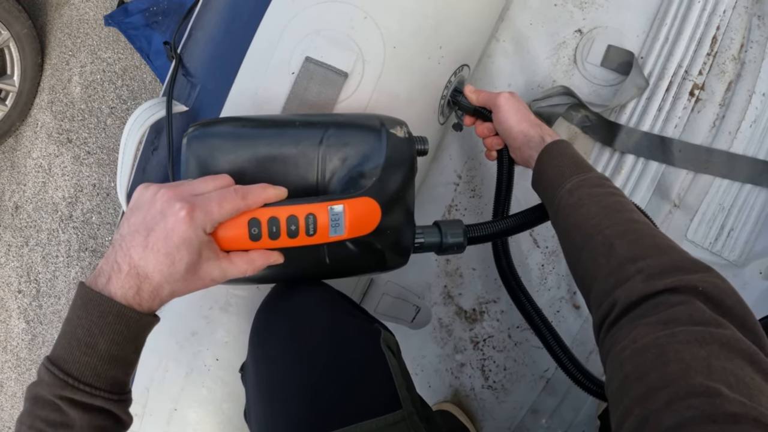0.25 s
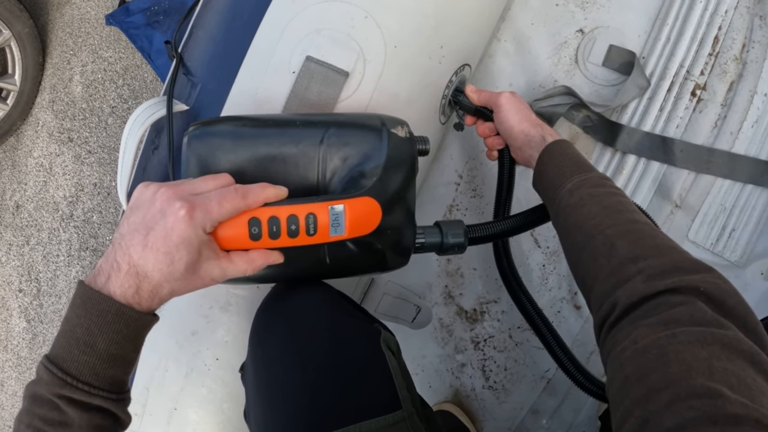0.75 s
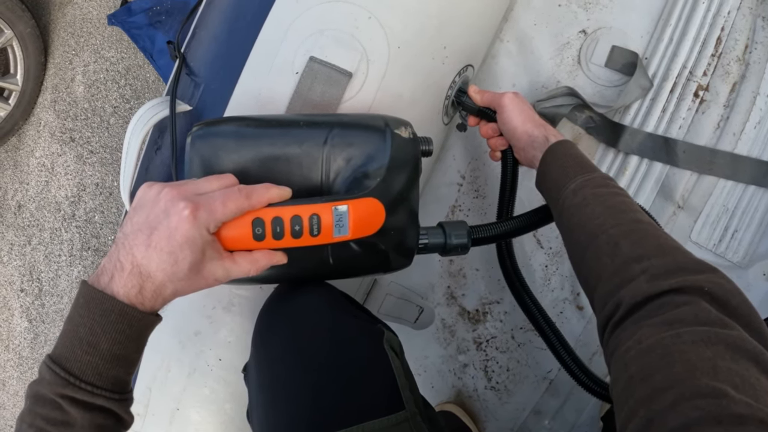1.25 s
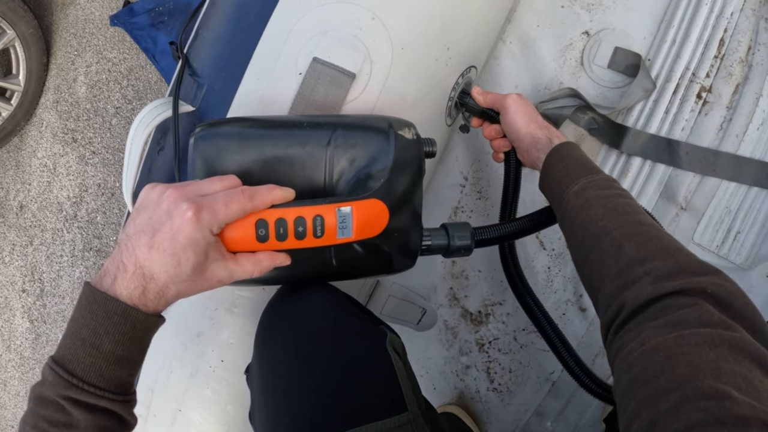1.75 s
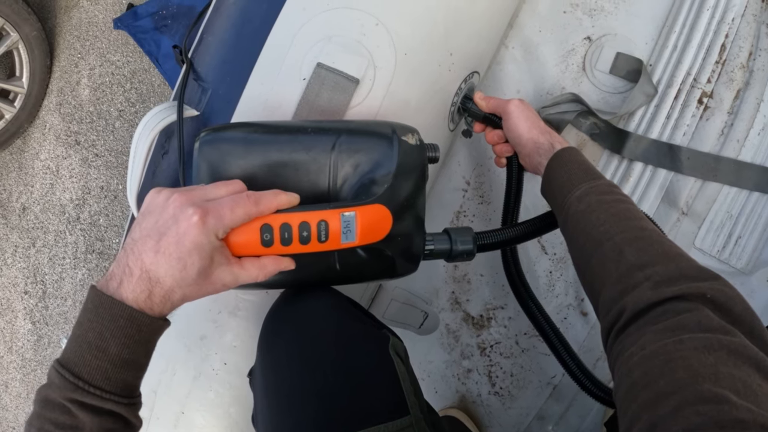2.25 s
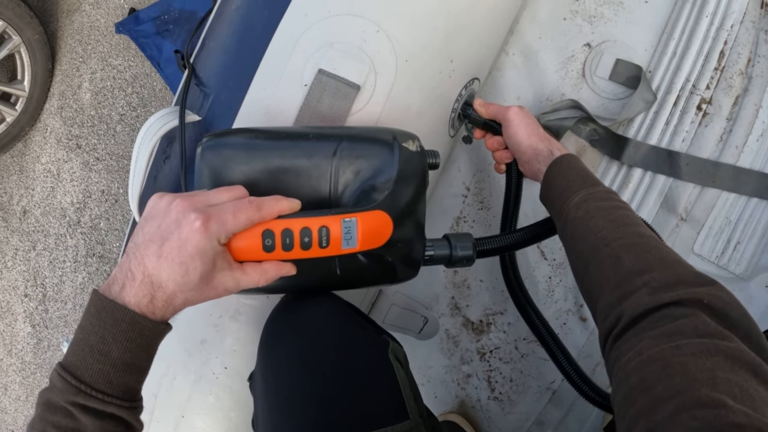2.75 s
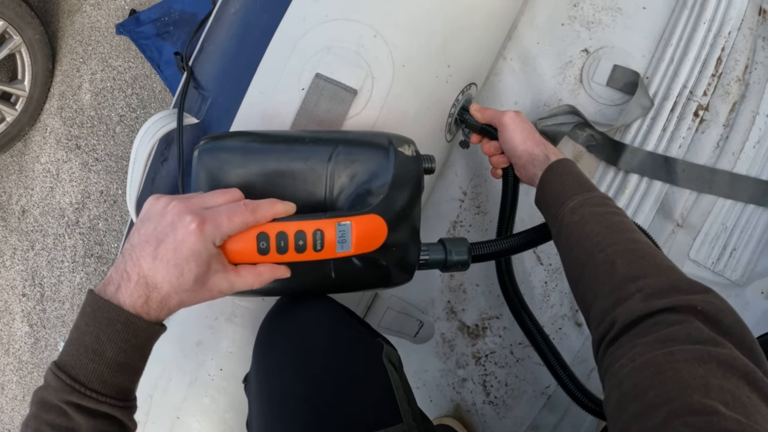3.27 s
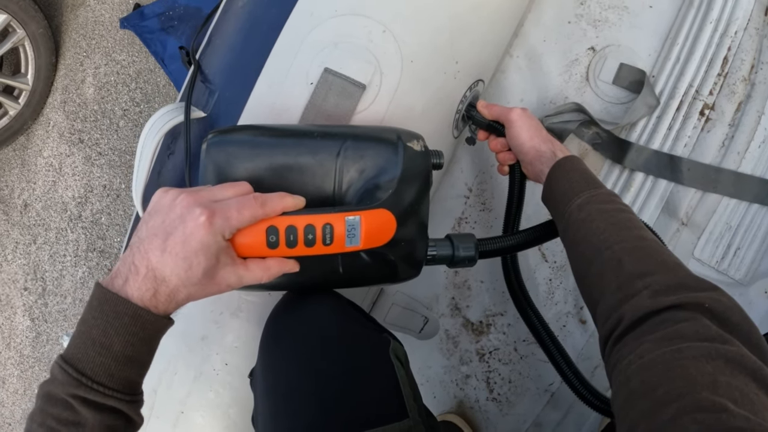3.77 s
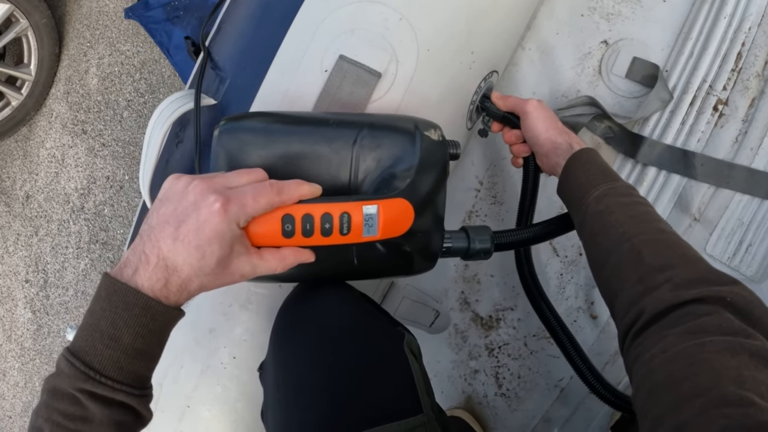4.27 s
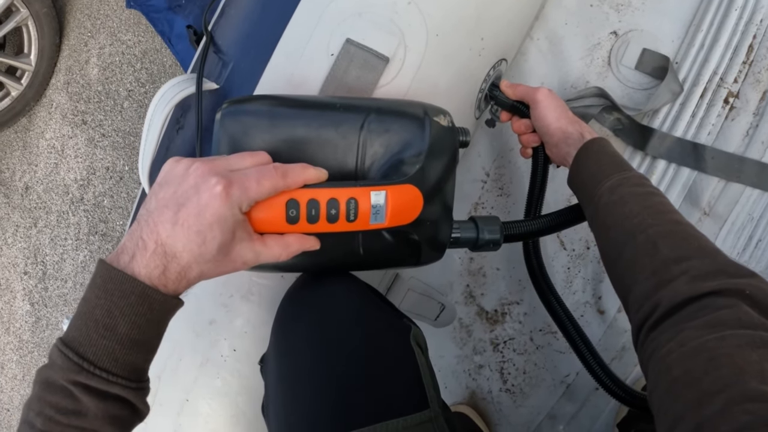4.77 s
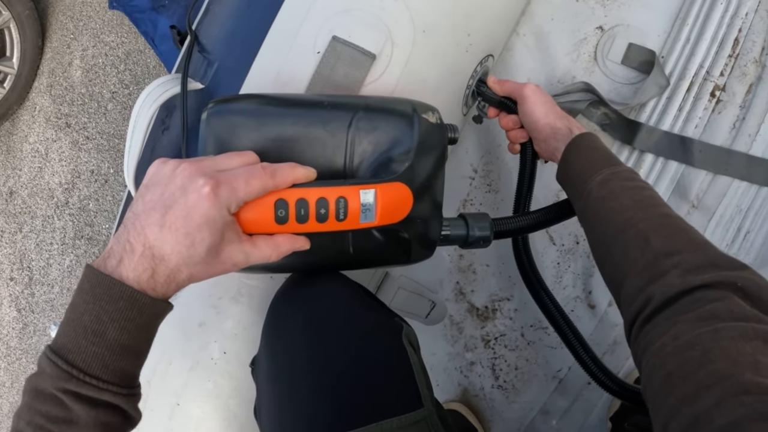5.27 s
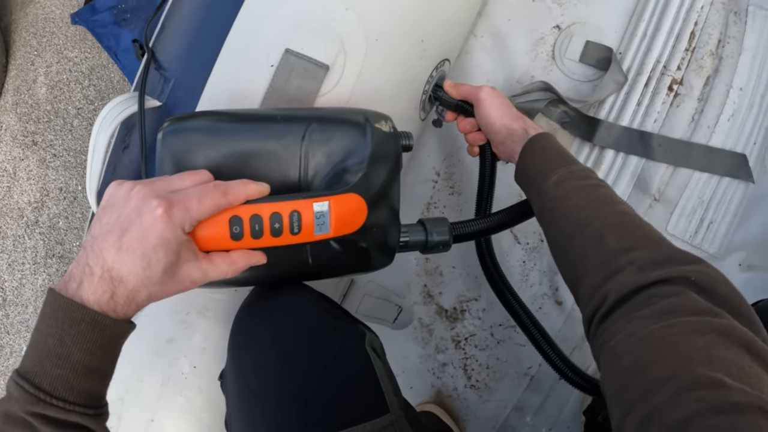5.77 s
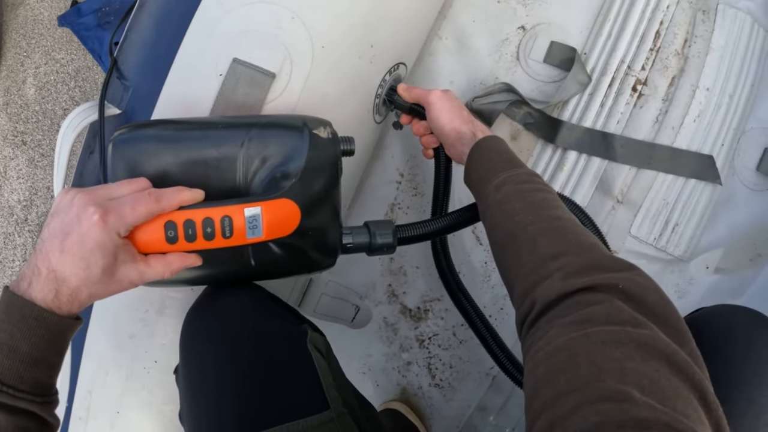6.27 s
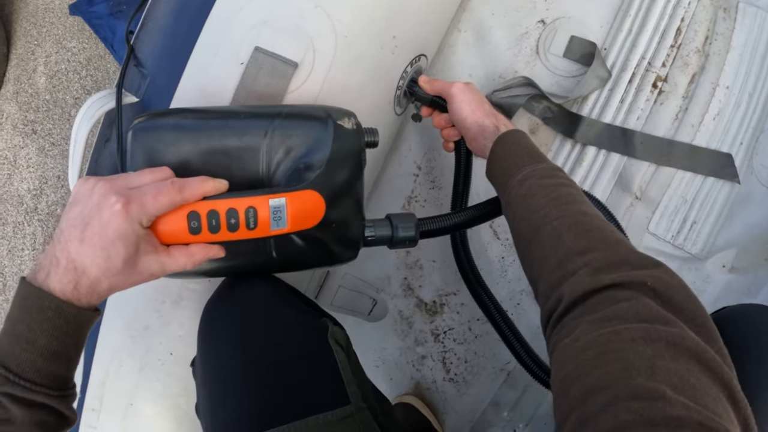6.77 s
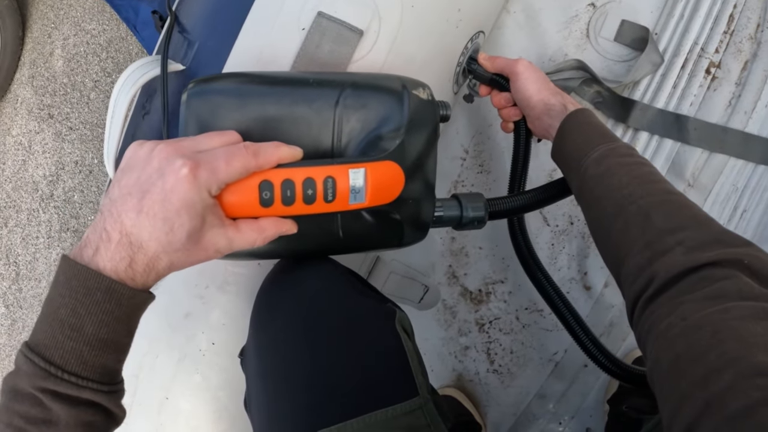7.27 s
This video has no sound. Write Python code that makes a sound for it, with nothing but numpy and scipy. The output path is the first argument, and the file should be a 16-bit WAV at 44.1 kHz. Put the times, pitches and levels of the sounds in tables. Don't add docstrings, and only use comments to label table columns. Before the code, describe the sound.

Loud, steady mechanical drone from a small piston pump inflating a rubber boat, already running at the start and still running at the end. Rapid valve snaps fuse into a coarse buzz with fluttering gear rattle and whine. Breathy hose air sits beneath. Thin, high leak hisses come and go at the nozzle, clearest in the second half, while soft wind rumble grows. Dry, open-air, close stereo pickup, with the pump mostly central.

```python
import sys
import numpy as np
from scipy import signal
from scipy.fft import rfft, irfft
from scipy.io import wavfile

SR = 44100
rng = np.random.default_rng(int(sys.argv[2]) if len(sys.argv) > 2 else 0)


def gain_from_decibels(decibels):
    exponent = np.asarray(decibels, float) / 20
    return 10 ** exponent


def to_wav(sig):
    pcm = np.clip(np.atleast_2d(sig), -1, 1) * 32767
    pcm = np.round(pcm).astype(np.int16)
    wavfile.write(sys.argv[1], SR, pcm.T)


N = 332073
HZ = np.fft.rfftfreq(N, 1 / SR) + 1
PINION, WHEEL = 11, 64


def rms_one(x):
    return x / np.sqrt(np.mean(x ** 2) + 1e-20)


def in_time(rows):
    s, *columns = np.transpose(rows)
    return [np.interp(np.arange(N) / SR, s, c) for c in columns]


def colour(x, points, turn=1):
    hz, db = np.transpose(points)
    gain = gain_from_decibels(np.interp(np.log(HZ), np.log(hz), db))
    return irfft(rfft(x) * turn * gain, N)


def drift(rate_hz):
    r = np.exp(-80 * np.pi * rate_hz / SR)
    slow = signal.lfilter([1], [1, -2 * r, r * r], rng.standard_normal(N // 40 + 2002))
    slow = slow[2000:]
    return np.interp(np.arange(N) / 40, np.arange(len(slow)), rms_one(slow))


def resonate(x, hz, width_hz):
    r = np.exp(-np.pi * width_hz / SR)
    poles = [1, -2 * r * np.cos(2 * np.pi * hz / SR), r * r]
    return signal.lfilter([(1 - r * r) / 2, 0, (r * r - 1) / 2], poles, x)


def tone(level_db, phase):
    return np.sqrt(2) * gain_from_decibels(level_db) * np.cos(phase)


def wide_noise(spectrum):
    # (frequency [Hz], level [dB])
    noise_side = [(60, -8.5), (300, -14), (1000, -10), (2500, 1.5), (5000, -9), (8000, 2.5), (12000, -0.5)]
    mid, side = (colour(w, spectrum) for w in rng.standard_normal((2, N)))
    return np.array([mid, colour(side, noise_side)]) / np.std(mid)


def causal_phases(level_db, size=128):
    tail = level_db[-1] - np.arange(1, size // 2 - len(level_db) + 2)
    cepstrum = irfft(np.log(gain_from_decibels(np.r_[level_db[0] - 10, level_db, tail])), size)
    cepstrum[1:size // 2] *= 2
    cepstrum[size // 2 + 1:] = 0
    return rfft(cepstrum).imag[1:len(level_db) + 1]


def stroke(crank, beat, flutter, unrest_db):
    # (multiple of the crank speed [1], level [dB])
    pulse = [(1, -22.0), (2, -30.9), (3, -26.9), (4, -18.9), (5, -21.2), (6, -30.4), (7, -31.2), (8, -28.3),
             (9, -39.0), (10, -35.9), (11, -35.1), (12, -31.9), (13, -44.3), (14, -29.8), (15, -39.6),
             (16, -43.1), (17, -32.0), (18, -36.5), (19, -39.9), (20, -47.7), (21, -56.9), (22, -45.4),
             (23, -54.1), (24, -44.2), (25, -43.5), (26, -48.6), (27, -52.6), (28, -46.5)]
    lead = [(1, .6), (2, 2.5), (3, 1.3), (4, 1.6), (5, .1), (6, 2.8), (7, .6), (8, .8), (9, -1.9),
            (10, 1.2), (12, 2.8), (14, 1.8), (15, 2.7), (17, 1.5), (18, 1.9), (19, 1.5), (22, .8),
            (24, -.4), (28, -3.5)]
    # (multiple [1], beats beside it [1], level [dB])
    passed_on = [(6, 1.0, -52), (8, -2.0, -52), (8, -1.0, -51), (8, 1.0, -47), (9, -1.0, -49),
                 (9, 1.0, -47), (10, -1.0, -51), (10, 1.0, -47), (11, -2.0, -49), (11, -1.5, -53),
                 (11, -1.0, -46), (11, 0.5, -50), (11, 1.0, -45), (11, 2.0, -48), (12, -1.0, -40),
                 (12, 1.0, -52), (13, -2.0, -49), (13, 1.0, -47), (13, 2.0, -50), (13, 2.5, -54),
                 (14, -2.0, -47), (14, -1.0, -42), (14, 1.0, -44), (14, 2.0, -49), (15, -2.0, -53),
                 (15, -1.0, -40), (15, 0.5, -54), (15, 1.0, -46), (16, -1.0, -51), (17, -2.0, -49),
                 (17, -1.0, -51), (17, 1.0, -43), (17, 1.5, -52), (17, 2.0, -46), (18, -2.5, -48),
                 (18, -2.0, -40), (18, -1.0, -37), (18, 0.5, -54), (18, 1.0, -47), (18, 2.0, -51),
                 (18, 2.5, -53), (19, -2.5, -55), (19, -2.0, -49), (19, -1.0, -47), (19, 1.0, -50),
                 (20, -2.0, -54), (20, -1.0, -54), (21, -1.0, -52), (22, -2.0, -53), (23, 1.5, -55),
                 (24, -1.0, -57), (24, 1.0, -56), (24, 2.0, -56), (28, -2.0, -57), (28, -1.0, -57),
                 (28, 1.0, -57)]
    multiple, level_db = np.transpose(pulse)
    phases = causal_phases(level_db) + np.interp(multiple, *np.transpose(lead))
    beat = beat - 2.5
    unrest = drift(48)
    out = 0
    for k, db, phase in zip(multiple, level_db, phases):
        reach = min(k / 11, 1) ** 3
        out = out + tone(db + reach * unrest_db * unrest, k * crank + phase + reach * flutter * unrest)
    for k, beats, db in passed_on:
        late = .5 if abs(beats) < 2 else 2.4
        if not 12 <= k <= 20:
            late = late + 3
        late = late + (beats % 1) * np.pi
        out = out + tone(db, k * crank + beats * beat + phases[int(k) - 1] - late)
    return out


def teeth(crank, beat, even, wheel_wear, pinion_wear, chance, load_db, beat_db):
    # (frequency [Hz], width [Hz], level [dB])
    casing = [(830, 130, 1.5), (943, 32, 6.5), (1147, 170, 4.5), (1640, 560, -8.5), (2440, 300, -1),
              (3340, 267, 2), (3960, 164, 2.5), (4207, 21, 7), (4335, 480, 0), (4840, 1400, -14.5)]
    first = np.ceil(crank[0] * WHEEL / 2 / np.pi)
    contact = np.arange(first, crank[-2] * WHEEL / 2 / np.pi).astype(int)
    where = np.interp(contact * 2 * np.pi / WHEEL, crank, np.arange(N))
    at, part = where.astype(int), where % 1
    wheel = rng.standard_normal(WHEEL)[contact % WHEEL]
    pinion = rng.standard_normal(PINION)[contact % PINION]
    force = even + wheel_wear * wheel + pinion_wear * pinion
    force = force + chance * rng.standard_normal(len(contact))
    force = force * gain_from_decibels(load_db * np.cos(crank[at] - .3) + beat_db * np.cos(beat[at]))
    force = force * gain_from_decibels(np.cos(2 * beat[at]) - 1.5 * np.cos(beat[at] / 2))
    knocks = np.zeros(N)
    knocks[at], knocks[at + 1] = force * (1 - part), force * part
    knocks = signal.sosfilt(signal.butter(4, 6200, fs=SR, output="sos"), knocks)
    out = 0
    for k, (hz, width_hz, db) in enumerate(casing):
        grip_db = 0.47 * drift(0.99)
        out = out + (-1) ** k * gain_from_decibels(db + grip_db) * resonate(knocks, hz, width_hz)
    return rms_one(out)


def motor(crank):
    # (multiple of the motor speed [1], level [dB])
    hum = [(1, -22), (2, -46), (3, -44), (4, -55)]
    angle = crank * WHEEL / PINION - 2.7
    return sum(tone(db + 0.24 * drift(1.6), k * angle - np.pi / 2) for k, db in hum)


def whine(crank, beat, waver, scatter, sway_db):
    # (multiple of the crank speed [1], beats beside it [1], level [dB])
    gear_tones = [(29, -1.0, -62), (29, -0.5, -67), (29, 0.0, -59), (29, 0.5, -63), (29, 1.0, -61),
                  (29, 2.0, -64), (30, -2.0, -64), (30, -1.0, -59), (30, 0.0, -58), (31, 0.0, -60),
                  (32, 0.0, -52), (33, 0.0, -59), (35, 0.0, -54), (36, 0.0, -52), (37, 0.0, -52),
                  (38, -1.0, -59), (39, 0.0, -53), (41, 0.0, -58), (43, 0.0, -58), (45, 0.0, -56),
                  (46, 0.0, -54), (48, 0.0, -59), (48, 1.0, -58), (49, 1.0, -56), (49, 2.0, -57),
                  (50, 0.0, -52), (50, 1.0, -58), (51, 0.0, -50), (51, 1.0, -54), (52, -1.0, -60),
                  (52, 0.0, -54), (52, 1.0, -55), (52, 2.0, -59), (53, -1.0, -58), (54, 0.0, -52),
                  (55, -0.5, -58), (55, 1.0, -54), (56, -1.0, -58), (56, 0.0, -54), (57, 0.0, -53),
                  (58, -0.5, -59), (58, 0.0, -47), (58, 1.0, -47), (58, 2.5, -60), (59, 0.0, -57),
                  (59, 1.0, -55), (60, 0.0, -58), (61, -2.0, -60), (61, -0.5, -60), (61, 0.0, -45),
                  (63, 0.0, -57), (64, 0.0, -49), (66, 0.0, -56), (66, 2.0, -57), (67, -1.0, -59),
                  (68, 0.0, -58), (69, -1.0, -60), (69, 0.0, -58), (70, -1.0, -57), (71, 0.0, -60)]
    # (time [s], more level [dB])
    mesh = [(0, -0.5), (3.6, -3), (4.3, 1), (5.4, -3), (6.0, 1.5), (6.8, 6), (7.1, -5), (7.53, 0)]
    loose = scatter * rng.standard_normal((2, 100))
    sways = [sway_db * drift(3.6) for _ in range(6)]
    wavers = [waver * drift(25) for _ in range(5)]
    mesh_db, = in_time(mesh)
    out = 0
    for k, beats, db in gear_tones:
        k = int(k)
        level_db = db + sways[k % 6] + (mesh_db if k == WHEEL else 0)
        phase = loose[0, k] + .5 * beats * loose[1, k] + wavers[k % 5]
        out = out + tone(level_db, k * crank + beats * beat + phase)
    return out


def rocking():
    shake = rng.standard_normal(N)
    modes = [(24.6, 1.4, -47.5), (49.0, 7.6, -36.5), (74.4, 1.4, -45.0)]  # Hz, width Hz, dB
    return sum(gain_from_decibels(db) * rms_one(resonate(shake, hz, width_hz)) for hz, width_hz, db in modes)


def air(crank, beat, leak_db):
    # (frequency [Hz], level per Hz [dB])
    rush = [(150, -26), (240, -6.5), (400, -9), (620, -4), (760, -7), (860, -9.5), (1180, -7.5),
            (1400, -8.5), (2200, -15.5), (3800, -27.5), (5500, -14), (6500, -25), (9000, -29), (13000, -38)]
    throb = gain_from_decibels(1.2 * np.cos(crank - .6) + 0.68 * np.cos(beat) + 2.17 * drift(40))
    leak = wide_noise([(5000, -30), (6600, 0), (7600, -4), (9000, -12), (12000, -16), (14000, -30)])
    spurts = gain_from_decibels(leak_db - 2 + 2 * np.cos(beat) + 2.5 * drift(12))
    return gain_from_decibels(-35) * throb * wide_noise(rush) + spurts * leak


def opened(at_s):
    rise_s = .04
    return .5 + .5 * np.tanh((np.arange(N) / SR - at_s) / rise_s)


def leak_level():
    # (time [s], length [s], more leak [dB])
    slips = [
        (1.6, 0.26, 7),
        (3.0, 0.54, 5),
        (4.15, 0.28, 14),
        (6.0, 0.88, 12.5),
    ]
    closed_db, seal_gives_s, seal_gives_db = -72, 4.15, 7
    slip_db = sum(db * (opened(s) - opened(s + length)) for s, length, db in slips)
    return closed_db + seal_gives_db * opened(seal_gives_s) + slip_db


def hump(start_s, length_s):
    part = np.clip((np.arange(N) / SR - start_s) / length_s, 0, 1)
    return np.sin(np.pi * part) ** 2


def wind():
    # (time [s], level [dB])
    breeze = [(0, -59), (.6, -66), (1.1, -53), (2.2, -50), (2.8, -56), (3.7, -51), (4.2, -57), (5.2, -48),
              (5.95, -59), (6.5, -44), (7.0, -51.5), (7.53, -51)]
    # (start time [s], length [s], level [dB])
    puffs = [(0.224, 0.036, -39), (0.957, 0.054, -45), (1.522, 0.036, -50), (2.077, 0.063, -40),
             (3.29, 0.036, -43), (3.413, 0.04, -45), (3.73, 0.052, -38), (5, 0.032, -42),
             (5.093, 0.026, -43), (5.224, 0.05, -38), (5.324, 0.075, -34), (5.452, 0.12, -42),
             (6.436, 0.06, -40), (6.58, 0.076, -44), (6.865, 0.054, -41)]
    lumps_db, puff_db, stretch = 3, -2.5, 1.25
    breeze_db, = in_time(breeze)
    gust = gain_from_decibels(breeze_db + lumps_db * drift(3.1))
    for s, length, db in puffs:
        start_s = s + length * (1 - stretch) / 2
        gust = gust + gain_from_decibels(db + puff_db) * hump(start_s, length * stretch)
    rumble = wide_noise([(12, -7), (30, 18.5), (60, 7), (110, 11.5), (190, 4.0), (400, -32)])
    return gain_from_decibels(8.5) * gust * rumble


def scene():
    # (time [s], speed [turns/s])
    crank_speed = [(0, 67.801), (0.4, 67.72), (0.9, 67.878), (2, 67.722), (2.5, 67.832), (3.4, 67.686),
                   (4, 67.654), (4.6, 67.718), (5.4, 67.629), (6.4, 67.638), (7.53, 67.686)]
    # (frequency [Hz], level [dB])
    port_side = [(70, -65), (270, -28), (540, -30), (750, -9.5), (1200, -16.5), (2000, -15.5), (4000, -8.5),
                 (8000, -44)]
    first_snap_s, hardest_rattle_s = .0075, .145
    settle_db, settle_s, creep_db_per_s = 0.5, 0.25, 0.0767
    s = np.arange(N) / SR
    loud_db = settle_db * np.exp(-s / settle_s) + creep_db_per_s * (s - s.mean())

    turns, = in_time(crank_speed)
    crank = 2 * np.pi * np.cumsum(turns) / SR
    crank = crank - crank[round(first_snap_s * SR)]
    beat = crank * (6 - WHEEL / PINION)
    beat = beat - beat[round(hardest_rattle_s * SR)]

    pump = stroke(crank, beat, flutter=0.13, unrest_db=0.84)
    pump = pump + gain_from_decibels(-36) * teeth(crank, beat, even=.01, wheel_wear=.1, pinion_wear=.05, chance=1.0,
                                   load_db=2.5, beat_db=3.0)
    pump = pump + motor(crank) + whine(crank, beat, waver=0.12, scatter=1.7, sway_db=1.35) + rocking()
    pump_side = colour(pump, port_side, turn=np.exp(-1.6j))
    machine = np.array([pump, pump_side]) + air(crank, beat, leak_level())
    mid, side = gain_from_decibels(loud_db) * machine + wind()
    return np.array([mid + side, mid - side])


def band_limit(x):
    return signal.sosfilt(signal.butter(12, 14200, fs=SR, output="sos"), x)


def record(dry):
    # (frequency [Hz], left minus right level [dB])
    left_more = [(60, 0.0), (110, 0.0), (200, 0.0), (360, 0.0), (650, -1.0), (1180, 0.5), (2140, 0.0),
                 (3890, -2.0), (7060, 0.5), (12800, 1.5)]
    hz, db = np.transpose(left_more)
    left = colour(dry[0], np.c_[hz, db / 2])
    right = colour(dry[1], np.c_[hz, -db / 2])
    return band_limit(np.array([left, right]))


dry = scene()
out = record(dry)
to_wav(out)
```